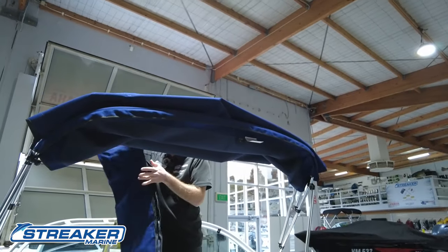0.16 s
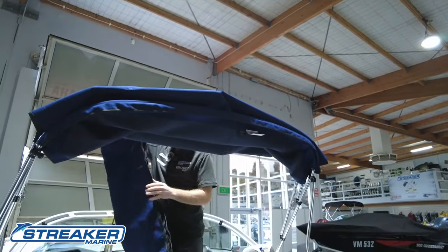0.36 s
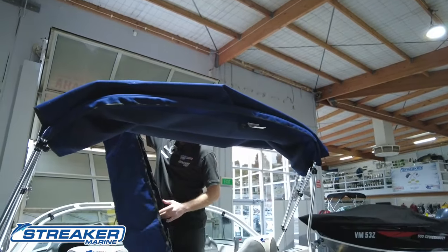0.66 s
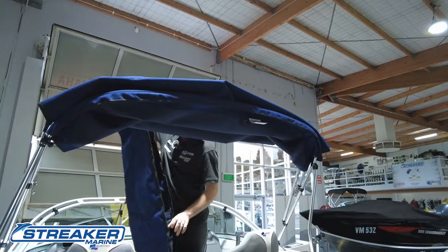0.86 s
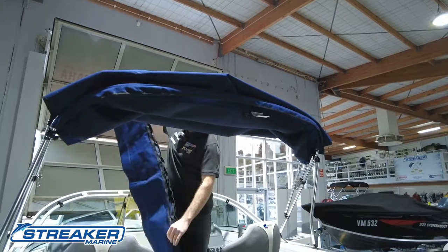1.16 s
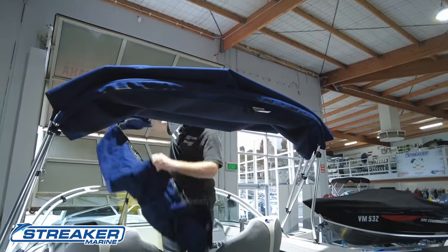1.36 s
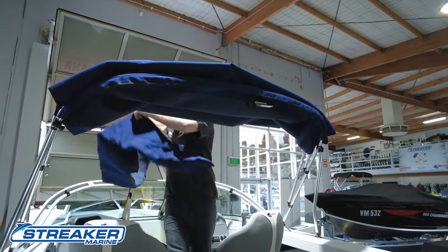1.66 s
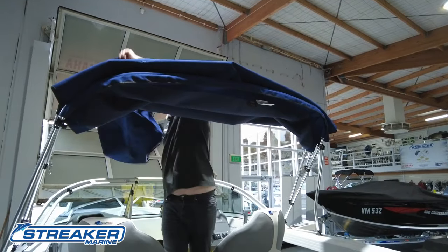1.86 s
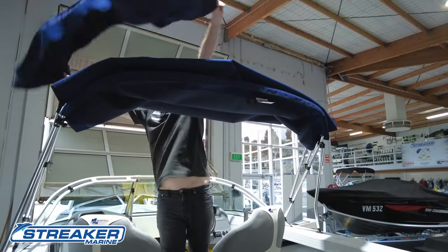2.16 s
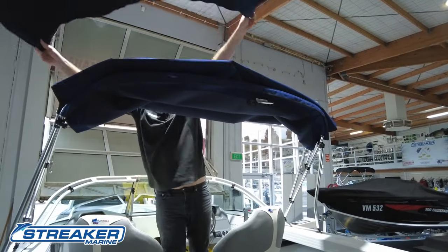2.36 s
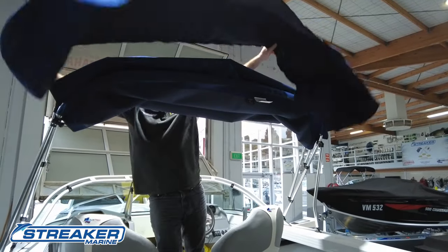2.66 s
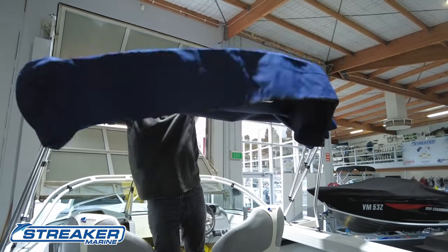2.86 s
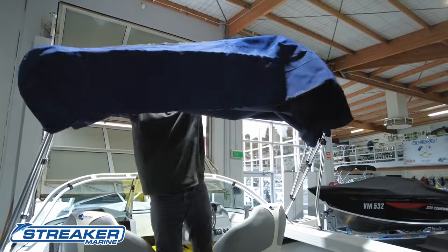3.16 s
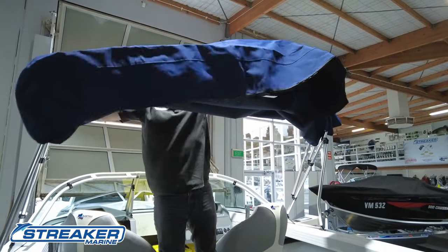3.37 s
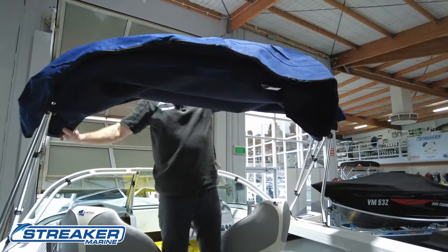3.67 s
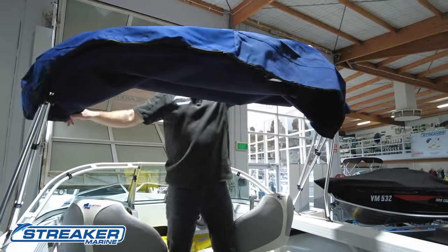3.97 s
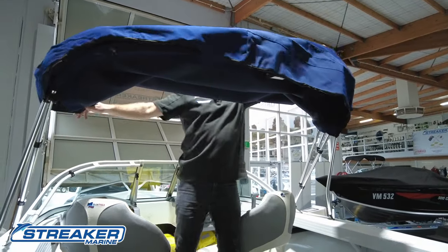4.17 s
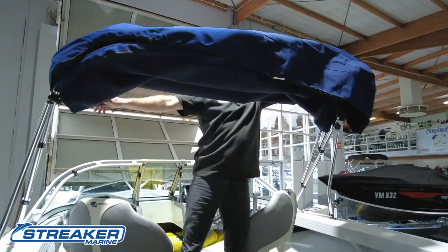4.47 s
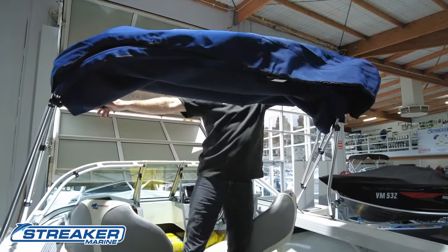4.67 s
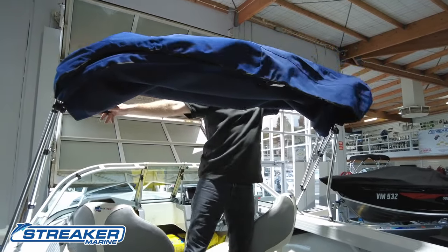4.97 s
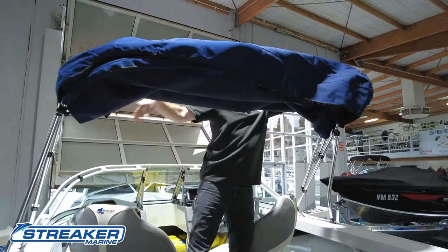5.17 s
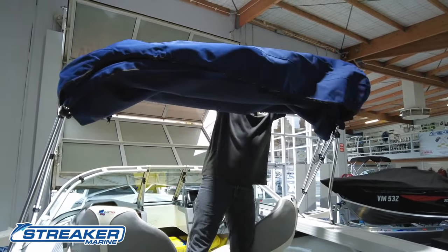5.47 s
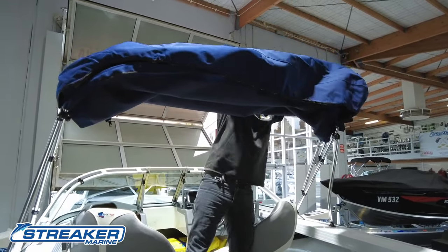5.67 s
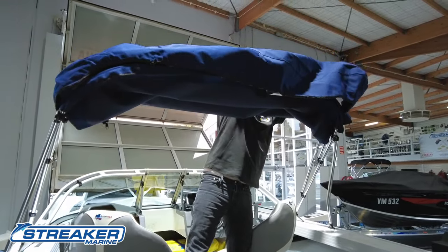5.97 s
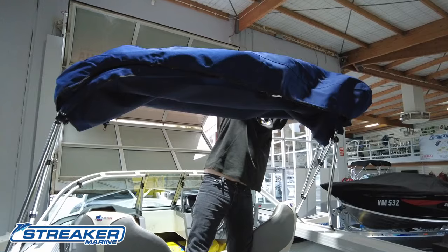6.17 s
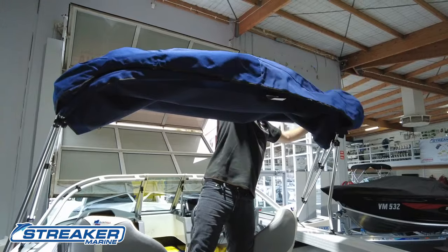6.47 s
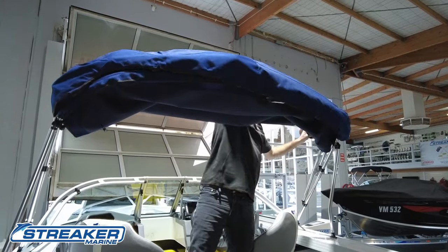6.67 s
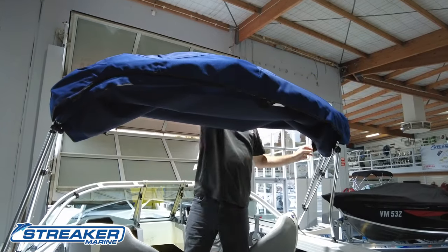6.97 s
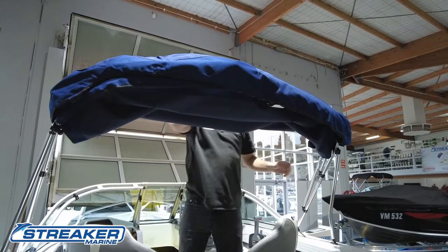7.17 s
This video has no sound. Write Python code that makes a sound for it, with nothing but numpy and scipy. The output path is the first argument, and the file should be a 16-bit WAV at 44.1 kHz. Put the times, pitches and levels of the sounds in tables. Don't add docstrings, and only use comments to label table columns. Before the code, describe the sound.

Close, dry canvas handling in a large shed with a faint low hum and a short dull wall reflection. From 0 to 0.4 s, bright brushes, scuffs and small knocks; then quiet rustling, with a short scrape at 1.2 s and a brush at 1.4 s. From 1.5 to 2.0 s the cloth is shaken: deep booming flaps, strong slaps around 1.63 and 1.82 s, and low air puffs. A lull, then a sharp bright crack with knocks at 2.75 s and rustling folds to 3.2 s. At 3.3-3.7 s a loud hissing double tug, with a slap at 3.5 s. A softer drag grows until 4.35 s and stops abruptly. Light creasing and knocks follow; a zip tinkles at 5.07-5.47 s. Folds buckle near 5.7-6.0 s. A long scraping sweep peaks at 6.6 s and fades. Around 7.15 s, slaps, rustle and a tiny stuttering squeak close it.

```python
import sys
import numpy as np
from scipy import signal
from scipy.fft import rfft, irfft, next_fast_len
from scipy.io import wavfile
from scipy.ndimage import uniform_filter1d

SR = 44100
rng = np.random.default_rng(int(sys.argv[2]) if len(sys.argv) > 2 else 0)


def unload_audio(sound):
    columns = np.transpose(np.atleast_2d(sound))
    steps = np.round(np.clip(columns, -1, 1) * 32767)
    wavfile.write(sys.argv[1], SR, steps.astype(np.int16))


def rack_gain(trim_db):
    fader = np.asarray(trim_db, float)
    return 10 ** (fader / 20)


N = 322371
TOP_HZ = 15780


def rms_one(x):
    return x / np.sqrt(np.mean(x ** 2) + 1e-20)


def in_time(rows):
    s, *columns = np.transpose(rows)
    return [np.interp(np.arange(N) / SR, s, column) for column in columns]


def drift(rate):
    r = np.exp(-40 * np.pi * rate / SR)
    steps = rng.standard_normal(N // 20 + 2002)
    slow = signal.lfilter([1], [1, -2 * r, r * r], steps)[2000:]
    return np.interp(np.arange(N) / 20, np.arange(len(slow)), rms_one(slow))


def coloured(x, spectrum):
    size = next_fast_len(N)
    hz, level_db = np.transpose(spectrum)
    log_hz = np.log(np.fft.rfftfreq(size, 1 / SR) + 1)
    shape_db = np.interp(log_hz, np.log(hz), level_db, left=-90, right=-90)
    return rms_one(irfft(rfft(x, size) * rack_gain(shape_db), size)[:N])


def ring(x, hz, t60):
    r, w = rack_gain(-60 / (t60 * SR)), 2 * np.pi * hz / SR
    return signal.lfilter([0, np.sin(w)], [1, -2 * r * np.cos(w), r * r], x + 1e-18)


def slips(per_s, spread_db, clump_db, clump_rate):
    sizes = rack_gain(spread_db * np.minimum(rng.exponential(1, N), 4)) * rng.choice([-1, 1], N)
    lets_go = rng.random(N) < per_s / SR
    return sizes * lets_go * rack_gain(clump_db * drift(clump_rate))


def burst(length, snap, size=2600):
    t = np.arange(size) / SR
    length = max(length, .001)
    push = rng.standard_normal(size) * np.exp(-(t / length) ** 2)
    push[0] = -snap * np.sqrt(length * SR)
    return push


def add(out, s, x):
    at = round(s * SR)
    out[at:at + len(x)] += x[:N - at]


def struck(events, snap, cycles, wide_db, below, above, order):
    out = np.zeros(N)
    for s, peak_db, hz, length in events:
        push = burst(length, snap)
        edges = [hz / below, min(hz * above, TOP_HZ)]
        band = signal.butter(order, edges, "band", fs=SR, output="sos")
        pitched = rms_one(ring(ring(push, hz, 2.6 / hz), hz, cycles / hz))
        crack = rms_one(signal.sosfilt(band, push))
        hit = pitched + rack_gain(wide_db) * crack
        add(out, s, rack_gain(peak_db) * hit / np.max(np.abs(hit)))
    return out


def swells(rows):
    t, power, part = np.arange(N) / SR, 0, 0
    for s, peak_db, rise, fall, part_db in rows:
        away = np.maximum((s - t) / rise, (t - s) / fall)
        one = rack_gain(2 * (peak_db - 20 * away))
        power, part = power + one, part + one * rack_gain(2 * part_db)
    return power, part


def levels(*layers):
    power, part = np.sum(layers, axis=0) + 1e-20
    return 10 * np.log10(power), 10 * np.log10(part / power)


# (time [s], effort as hiss level [dB], slackness: boom against hiss [dB])
HANDLING = [(0.0, -63.5, 5.5), (0.2, -67, 1), (0.41, -65.5, 2.5), (0.67, -74, 8), (0.95, -78, 14.5),
            (1.4, -64.5, 7), (1.9, -82.5, 19.5), (2.3, -73.5, 4.5), (2.7, -92, 22), (2.8, -74.5, 23),
            (3.3, -70.5, 9), (4.45, -69.5, 8), (4.9, -73, 10), (5.56, -79.5, 12), (5.7, -66, 4.5),
            (6.13, -71.5, 8), (7.05, -70, 10), (7.31, -68, -1)]
# (time [s], effort [dB], slackness [dB])
YANK = [
    (3.29, -84, 7),
    (3.325, -51.5, -2.5),
    (3.38, -41, -3.5),
    (3.5, -46, 1),
    (3.58, -42, 1),
    (3.62, -49, 6.5),
    (3.66, -64, 7),
    (3.72, -82, -1),
]
CREEP = [
    (3.6, -81, 3.8),
    (3.8, -67, 10.5),
    (4.09, -60, 5.6),
    (4.27, -56.5, 7.4),
    (4.34, -56, 4.2),
    (4.4, -83, 7.9),
    (4.45, -90, 8),
]
SWEEP = [
    (6.13, -77, 14.5),
    (6.29, -59.5, -0.5),
    (6.33, -52, -3.5),
    (6.39, -53.5, 4.5),
    (6.55, -46, 3),
    (6.61, -44, 7),
    (6.7, -50, 8),
    (6.84, -62.5, 3),
    (6.96, -78, -6),
]


def pulls(slack, part_db):
    t, power, part = np.arange(N) / SR, 0, 0
    for rows, db in zip((HANDLING, YANK, CREEP, SWEEP), part_db):
        effort_db, slack_db = in_time(rows)
        lasts = (t >= rows[0][0]) * (t <= rows[-1][0])
        one = rack_gain(2 * (effort_db + slack * slack_db)) * lasts
        power, part = power + one, part + one * rack_gain(2 * db)
    return power, part


# (frequency [Hz], level [dB per Hz])
SHED = [(15, 1.5), (40, -4), (250, -9), (500, -23), (1700, -25), (3800, -55), (7000, -60), (12800, -67)]


def shed_hum():
    return rack_gain(-58 - 2.5) * coloured(rng.standard_normal(N), SHED)


def patchy(x, patchy_db, rate, count=6):
    edges = np.geomspace(3000, 16000, count + 1)
    size = next_fast_len(N)
    spectrum, hz = rfft(x, size), np.fft.rfftfreq(size, 1 / SR)
    slices = np.clip(np.searchsorted(edges, hz) - 1, 0, count - 1)
    out = 0
    for k in range(count):
        out = out + rack_gain(patchy_db * drift(rate)) * irfft(spectrum * (slices == k), size)[:N]
    return out


# (frequency [Hz], level [dB per Hz])
HISS = [(3700, -13), (4300, -6.5), (4820, -3), (5600, -4), (6700, -2), (8300, -5.5), (9800, -12),
        (11500, -33.5)]
SHEEN = [(9000, -29), (10500, -1.5), (12500, 0), (15000, -4), (15800, -5)]
RASP = [(1300, -12), (1800, 1), (2400, 5), (3000, 3.5), (3700, 0.5), (4600, -2)]
# (handling [dB], yank [dB], creep [dB], sweep [dB])
PULL_RASP_DB = (-3.5, -6.5, -4, -6)
# (peak time [s], hiss level [dB], rise [s], fall [s], rasp against hiss [dB])
BRUSHES = [(0.12, -56, 0.22, 0.15, 1), (0.262, -48.5, 0.034, 0.08, -6), (0.29, -48, 0.05, 0.043, -6),
           (0.71, -65, 0.028, 0.051, -3), (0.835, -65, 0.019, 0.11, 0.5), (1.12, -62.5, 0.23, 0.19, -2.5),
           (1.24, -64.5, 0.061, 0.15, 2), (1.39, -54.5, 0.019, 0.12, -1), (1.6, -68.5, 0.27, 0.029, 5.5),
           (1.71, -62.5, 0.046, 0.062, 0), (1.84, -54, 0.11, 0.097, -2), (1.97, -66, 0.031, 0.063, 3.5),
           (2.18, -63, 0.16, 0.1, -6.5), (2.75, -51, 0.013, 0.11, 0.5), (2.82, -75, 0.1, 0.042, -6),
           (3.04, -59.5, 0.45, 0.24, -3), (3.069, -54, 0.0096, 0.0083, 3.5), (4.6, -67, .3, 0.22, -2.5),
           (5.15, -66, 0.4, 0.18, -4), (5.48, -70.5, 0.5, 0.14, -5.5), (5.62, -59.5, 0.023, 0.053, 1),
           (5.99, -59.5, 0.15, 0.13, -2), (7.02, -55.5, 0.051, 0.051, -6), (7.17, -56, 0.13, 0.087, -5)]


def slide():
    hiss_db, rasp_db = levels(pulls(False, PULL_RASP_DB), swells(BRUSHES))
    sheen_db = -16.5 + 0.088 * (hiss_db + 61) + 0.5 * drift(9.0)
    threads = slips(40000, spread_db=2.5, clump_db=0.94, clump_rate=160)
    threads = patchy(threads, patchy_db=2.0, rate=9.4)
    fine = coloured(threads, HISS) + rack_gain(sheen_db) * coloured(threads, SHEEN)
    rasp = coloured(slips(9000, spread_db=2.0, clump_db=2.0, clump_rate=21), RASP)
    return rack_gain(hiss_db) * (fine + rack_gain(rasp_db) * rasp)


# (frequency [Hz], level [dB per Hz])
SLACK = [(90, -11), (150, -3.5), (250, 2.5), (400, 2), (580, 1.5), (800, 0), (1050, -23)]
TAUT = [(700, -2.5), (950, 1.5), (1300, -0.5), (1700, -6), (2300, -11.5)]
# (handling [dB], yank [dB], creep [dB], sweep [dB])
PULL_TAUT_DB = (-3.5, -1, -3.5, -6)
# (peak time [s], boom level [dB], rise [s], fall [s], tautness: upper against lower modes [dB])
BUCKLES = [(0.13, -56.5, 0.12, 0.1, 0.5), (0.3, -52, 0.19, 0.1, -4), (1.38, -64.5, 0.14, 0.39, 3),
           (1.635, -46, 0.047, 0.05, -21), (1.7, -49.5, 0.073, 0.068, -9.5), (1.85, -53, 0.12, 0.18, -11),
           (2.2, -68, 0.11, 0.23, -4.5), (2.785, -45.5, 0.069, 0.077, -2), (3.01, -50.5, 0.21, 0.4, -2),
           (3.15, -51, 0.32, 0.19, -20), (4.52, -56.5, 0.26, 0.17, -8), (4.61, -56, 0.16, 0.17, 0.5),
           (4.83, -60.5, 0.051, 0.48, -2.5), (5.09, -55, 0.093, 0.12, -6), (5.46, -66.5, 0.23, 0.12, 0),
           (5.72, -58.5, 0.23, 0.062, -3), (5.82, -60, 0.097, 0.075, 1), (5.88, -56, 0.17, 0.11, -9),
           (5.99, -49, 0.047, 0.12, -3.5), (7.15, -57.5, 0.073, 0.078, -1)]


def crease():
    boom_db, taut_db = levels(pulls(True, PULL_TAUT_DB), swells(BUCKLES))
    kicks = slips(1500, spread_db=2.0, clump_db=2.5, clump_rate=20)
    mode_db = np.clip(0.23 * (boom_db + 29.5), -20, 6)
    mode = rack_gain(mode_db) * rms_one(ring(kicks, 670, 0.01))
    boom = (coloured(kicks, SLACK) + mode) * rack_gain(-4.0)
    crackle = slips(2500, spread_db=2.5, clump_db=2.0, clump_rate=21)
    upper = coloured(kicks + crackle, TAUT)
    return rack_gain(boom_db) * (boom + rack_gain(taut_db) * upper)


# (handling [dB], yank [dB], creep [dB], sweep [dB])
PULL_AIR_DB = (-17, -28, -26, -5.5)
# (peak time [s], level [dB], rise and fall [s])
PUFFS = [(0.3, -44, 0.081), (1.65, -42, 0.21), (1.72, -45, 0.11), (1.85, -41, .08), (2.1, -56, 0.39),
         (2.79, -44.5, 0.14), (2.89, -44, 0.067), (3.08, -48, 0.39), (3.41, -46, 0.13), (3.62, -48, 0.67),
         (4.43, -55, 0.11), (4.6, -54, 0.16), (5.8, -50, 0.14), (6.01, -53, 0.17), (6.5, -47, 0.23),
         (6.63, -49, 0.071), (7.15, -61, 0.64)]


def air():
    spectrum = [(8, -28), (20, 5.5), (45, -6.0), (90, -12.0), (160, -23)]  # (Hz, dB per Hz)
    swell = coloured(rng.standard_normal(N), spectrum)
    puffs = swells([(s, db, length, length, 0) for s, db, length in PUFFS])[0]
    still_air_db, flap_s, flap_db, flap_width_s = -62, 1.956, -30, 0.0036
    pushed = np.sqrt(puffs + pulls(True, PULL_AIR_DB)[1] + rack_gain(2 * still_air_db))
    flap = rack_gain(flap_db) * np.exp(-((np.arange(N) / SR - flap_s) / flap_width_s) ** 2)
    return pushed * rack_gain(2.1 * drift(25)) * swell - flap


def far_walls(x):
    t60_s, wet_db, wall_cut_hz = 0.11, -21.5, 5200
    t = np.arange(SR // 2) / SR
    tail = rng.standard_normal(len(t)) * rack_gain(-60 * t / t60_s) * (t > .012)
    tail = signal.sosfilt(signal.butter(1, wall_cut_hz, fs=SR, output="sos"), tail)
    return rack_gain(wet_db) * signal.fftconvolve(x, tail / np.linalg.norm(tail))[:N]


# (peak time [s], level [dB], centre [Hz], rise [s], fall [s])
SCRAPES = [(0.12, -51, 3450, 0.059, 0.069), (0.42, -65.5, 2360, 0.5, 0.34), (1.12, -62.5, 2300, 0.28, 0.18),
           (1.235, -48.5, 2670, 0.023, 0.019), (2.77, -44, 1080, 0.038, 0.11),
           (3.59, -41, 1780, 0.068, 0.063), (4.31, -49, 616, 0.42, 0.052), (6.55, -50.5, 3500, .3, 0.33),
           (6.6, -45.5, 1470, 0.11, 0.16), (.28, -52, 3600, 0.049, 0.06), (3.12, -63.5, 6030, 0.21, 0.13),
           (6.4, -54.5, 149, 0.22, .1), (6.62, -43, 1004, 0.19, 0.21), (6.63, -40.5, 603, 0.2, 0.22)]


def scrapes():
    grains = slips(5500, spread_db=5.0, clump_db=-1.0, clump_rate=43)
    out = np.zeros(N)
    for s, db, hz, rise, fall in SCRAPES:
        t60 = 6.6 / hz
        swell = np.sqrt(swells([(s, db, rise, fall, 0)])[0])
        out += swell * rms_one(ring(ring(grains, hz, t60), hz, t60))
    return out


# (time [s], peak level [dB], centre [Hz], length [s])
SCUFFS = [(0.162, -34.5, 4500, 0.0033), (0.0975, -33, 7500, 0.0051), (0.71, -59, 5000, 0.008),
          (1.237, -40.5, 5870, 0.0097), (1.385, -39, 6800, 0.0072), (1.5464, -45, 7070, 0.0068),
          (1.5904, -35, 6100, 0.019), (1.662, -45.5, 6470, 0.008), (1.7044, -47, 6160, 0.0073),
          (1.843, -51, 5930, 0.008), (1.96, -47, 4720, 0.013), (2.0238, -55, 5400, 0.0072),
          (2.737, -31.5, 6100, 0.004), (2.864, -42.5, 4900, 0.0043), (3.064, -36.5, 5900, 0.0087),
          (4.579, -44, 1590, 0.006), (3.079, -42, 5500, 0.0024), (1.596, -38, 2540, 0.0096),
          (2.72, -49, 1800, 0.011), (5.609, -43, 7450, 0.0067), (5.723, -49.5, 3400, 0.0087),
          (5.789, -49, 7540, 0.0072), (5.978, -41, 3070, 0.0095), (6.194, -52, 6040, 0.0087),
          (5.163, -35, 9900, 0.0083), (7.029, -56, 4070, 0.0088), (7.0838, -43, 5700, 0.0073),
          (7.128, -45, 6500, 0.0092), (7.155, -38, 3530, 0.0077)]


def scuffs():
    return rack_gain(-3.0) * struck(SCUFFS, snap=0.38, cycles=16.0, wide_db=-0.5, below=1.67, above=1.45, order=2)


# (frequency [Hz], level [dB], t60 [s])
SLIDER_LOW = [(3620, -11.5, 0.025), (6070, -4.5, 0.013), (6750, -6, 0.021)]
SLIDER_HIGH = [(8570, -2, 0.019), (8970, 0, 0.019), (9900, -8, 0.021)]
TAB = [(7460, -16, 0.05), (11500, -11, 0.19), (7950, -14, 0.05)]
# (time [s], slider low modes [dB], slider high modes [dB], tab [dB], chatter length [s])
ZIP = [(0.1, -60, -52.5, -66, 0.0027), (0.164, -66, -44.5, -62, 0.0045), (1.694, -52, -51, -66, .004),
       (5.068, -70, -56, -70, .012), (5.078, -47, -66, -72, .004), (5.102, -45, -53, -58, 0.011),
       (5.13, -45, -53, -60, 0.011), (5.16, -36.5, -36, -70, 0.0068), (5.255, -57, -67, -78, .004),
       (5.274, -54, -74, -80, .003), (5.369, -55, -74, -80, 0.012), (5.453, -61, -60, -57, 0.0031),
       (5.467, -69, -69, -66, 0.0027), (7.202, -70, -55, -64, 0.0035), (7.234, -64, -58, -70, 0.0029)]


def zip_rattle():
    out, share = np.zeros(N), rng.normal(0, 1, (len(ZIP), 3, 3))
    for (s, *levels_db, length), luck in zip(ZIP, share):
        push = np.pad(burst(length, snap=0.64), (0, 6000)) / np.sqrt(max(length, .001) * SR)
        for level_db, modes, row in zip(levels_db, (SLIDER_LOW, SLIDER_HIGH, TAB), luck):
            for (hz, db, t60), k in zip(modes, row):
                near_mode = signal.lfilter(*signal.iirpeak(hz, 5.0, SR), push)
                add(out, s, rack_gain(level_db + db + 2 * k) * ring(near_mode, hz, t60))
    return out


# (time [s], level [dB])
PINGS = [
    (0.164, -64),
    (1.5, -68),
    (1.694, -59),
    (2.19, -70),
    (5.072, -68),
    (5.103, -66),
    (5.126, -68),
    (5.164, -61),
    (5.467, -71),
    (7.2, -74),
]


def pings():
    flicks = np.zeros(N)
    for s, db in PINGS:
        add(flicks, s, rack_gain(db) * burst(.003, snap=.6) / 10)
    return ring(flicks, 15600, .15)


# (time [s], peak level [dB], pitch [Hz], length [s])
KNOCKS = [(0.226, -56, 410, 0.0021), (0.348, -41, 395, .002), (0.302, -40, 1200, .004),
          (0.748, -51, 380, .003), (1.079, -43, 1780, .006), (1.329, -48, 466, 0.0047),
          (1.518, -45, 665, 0.0052), (1.561, -44, 700, .003), (1.626, -36, 410, 0.0015),
          (1.643, -29.5, 760, .004), (1.677, -41, 471, .003), (1.712, -41, 690, .008),
          (1.74, -45, 500, .005), (1.799, -41, 584, 0.0044), (1.879, -43.5, 408, .006),
          (1.951, -42, 458, .005), (1.972, -45, 406, 0.0036), (2.002, -50, 393, 0.0033),
          (2.192, -45, 600, 0.0019), (2.732, -45, 410, 0.0034), (2.745, -33, 990, .004),
          (2.762, -44, 1000, .005), (2.787, -34, 880, 0.0056), (2.82, -37, 1000, .006),
          (3.015, -41, 900, 0.011), (3.068, -41, 2500, .004), (3.097, -42, 330, .004),
          (3.17, -44, 585, 0.0033), (3.311, -51, 845, .004), (4.451, -47, 361, 0.003),
          (4.573, -41, 460, 0.0037), (4.663, -49, 385, 0.0035), (4.705, -46, 655, .008),
          (4.801, -47, 312, .004), (4.86, -46, 2030, .002), (4.948, -48, 685, .004),
          (5.052, -51, 832, .004), (5.088, -44, 445, 0.0064), (5.106, -49, 910, .002),
          (5.159, -49, 384, 0.0036), (5.202, -48.5, 500, .003), (5.463, -46.5, 487, .003),
          (5.608, -45, 604, 0.0017), (5.632, -48, 500, .003), (5.724, -46.5, 700, .004),
          (5.759, -55, 431, .003), (5.961, -51, 388, .005)]


def knocks():
    return struck(KNOCKS, snap=1.2, cycles=6.0, wide_db=-2.0, below=2.5, above=2.1, order=4)


# (time [s], peak level [dB], panel pitch [Hz], slap length [s])
SLAPS = [(0.268, -39.5, 900, 0.0049), (0.335, -38.5, 600, 0.0018), (4.889, -52, 900, 0.0019),
         (1.381, -42, 970, 0.01), (1.586, -36, 466, 0.013), (1.632, -26.5, 610, 0.011),
         (1.694, -37, 407, 0.0083), (1.817, -26, 610, 0.0053), (1.84, -33.5, 556, 0.0049),
         (1.936, -42.5, 400, 0.0053), (2.024, -54, 507, 0.0056), (2.193, -45.5, 700, 0.0025),
         (2.7405, -27, 1670, 0.0043), (2.863, -36.5, 1290, 0.0036), (2.965, -37, 795, 0.0033),
         (2.995, -36.5, 400, 0.023), (3.057, -38.5, 405, 0.0045), (3.169, -50, 596, .005),
         (3.487, -28.5, 566, 0.0089), (4.332, -37, 606, 0.017), (4.516, -42, 400, 0.011),
         (4.577, -38.5, 616, 0.0063), (4.867, -42.5, 468, 0.011), (5.698, -41.5, 483, .006),
         (5.814, -40, 414, 0.0076), (5.885, -39.5, 457, 0.013), (6.816, -37.5, 760, 0.0019),
         (7.127, -37.5, 626, 0.0045), (7.1545, -36, 725, 0.0032), (7.288, -42, 1400, 0.0017)]


def slaps():
    return struck(SLAPS, snap=0.55, cycles=7.5, wide_db=-5.5, below=3.03, above=2.36, order=4)


# (start time [s], length [s], from [Hz], to [Hz], level [dB])
SQUEAK = [(7.127, .021, 4200, 4650, -56), (7.127, .014, 6700, 6200, -58), (7.127, .02, 7700, 7100, -62),
          (7.13, .009, 2750, 3050, -55), (7.14, .008, 3200, 3300, -59), (7.155, .006, 2950, 2720, -48),
          (7.155, .008, 5800, 5300, -56), (7.155, .016, 4700, 4600, -60), (7.161, .009, 2450, 2750, -57),
          (7.173, .007, 3450, 3700, -60), (7.174, .006, 2650, 2800, -54), (7.176, .012, 5400, 5800, -57),
          (7.179, .01, 2800, 3050, -50), (7.184, .016, 4050, 4050, -60), (7.192, .004, 2950, 3050, -56)]


def squeak():
    out, t = np.zeros(N), np.arange(1500) / SR
    waver, flutter, edge_s = drift(251), drift(150), 0.0013
    for k, (s, length, from_hz, to_hz, db) in enumerate(SQUEAK):
        own = slice(3000 * k, 3000 * k + len(t))
        glide = from_hz + (to_hz - from_hz) * t / length
        hz = glide * (1 + 0.016 * waver[own])
        gate = np.clip(np.minimum(t, length - t) / edge_s + .5, 0, 1) * (t > 0)
        add(out, s, rack_gain(db + 4.0 * flutter[own]) * gate * np.sin(2 * np.pi * np.cumsum(hz) / SR))
    return out


def scene():
    cover = slide() + crease() + scrapes() + scuffs() + zip_rattle()
    cover = cover + pings() + knocks() + slaps() + squeak()
    return (cover + far_walls(cover) + air() + shed_hum())[None]


# (frequency [Hz], ..)
GATE_EDGES_HZ = (12800, 13500, 14200, 14900, 16600)
# (level [dB], ..)
GATE_DB = (-102, -100.5, -99.5, -99)


def gated_top(x, size=1200):
    length = next_fast_len(N)
    spectrum, hz, out = rfft(x, length), np.fft.rfftfreq(length, 1 / SR), x.copy()
    for low, high, gate_db in zip(GATE_EDGES_HZ, GATE_EDGES_HZ[1:], GATE_DB):
        band = irfft(spectrum * ((hz >= low) & (hz < high)), length)[..., :N]
        shut = uniform_filter1d(band ** 2, size) < rack_gain(2 * gate_db)
        out -= band * uniform_filter1d(shut * 1., size // 2)
    return out


def band_limit(x):
    return signal.sosfilt(signal.butter(12, 16320, fs=SR, output="sos"), x)


def record(dry):
    cut = signal.sosfilt(signal.cheby2(12, 60, TOP_HZ + 800, fs=SR, output="sos"), dry)
    return band_limit(gated_top(cut))


dry = scene()
out = record(dry)
unload_audio(out)
```